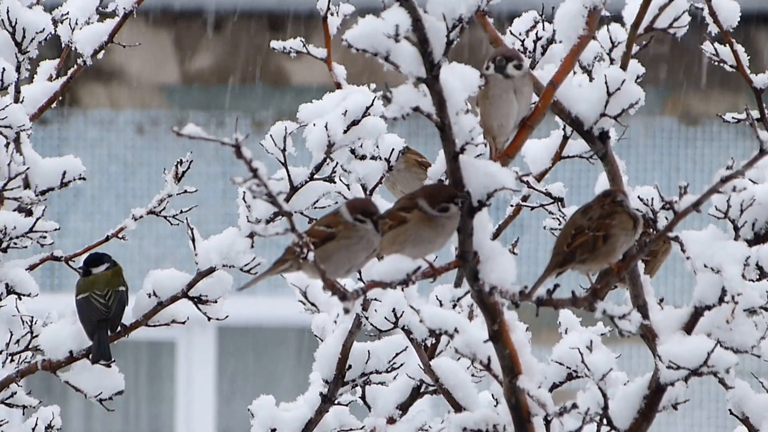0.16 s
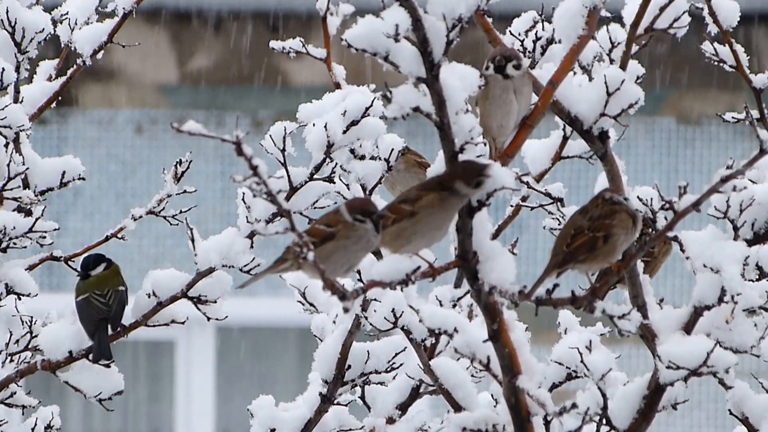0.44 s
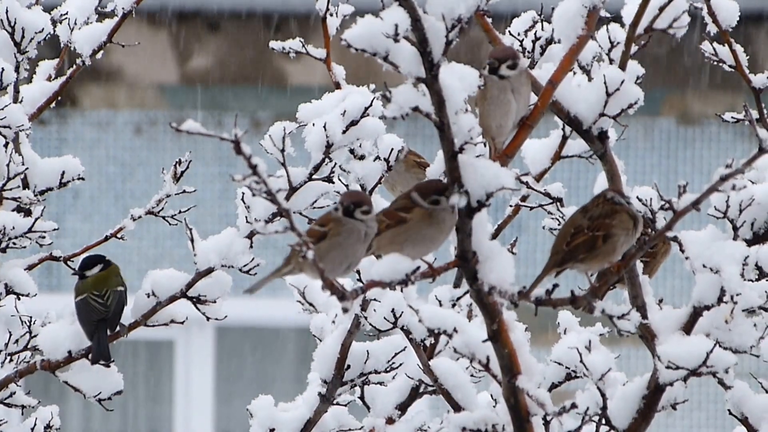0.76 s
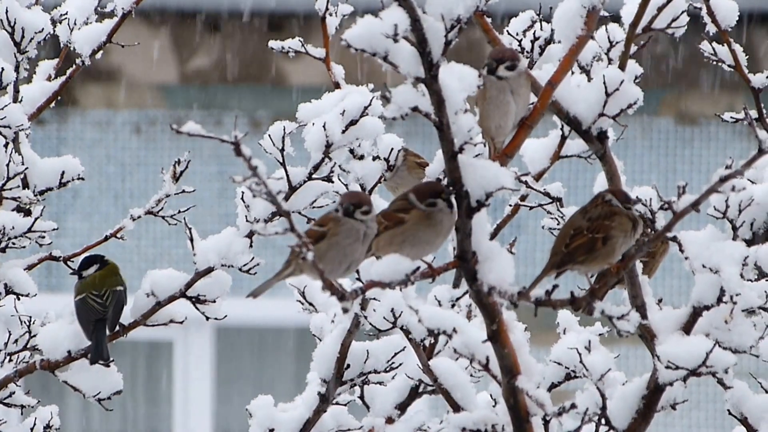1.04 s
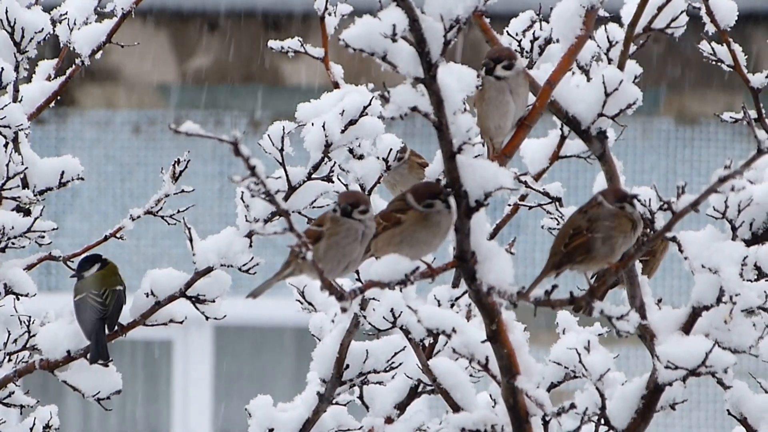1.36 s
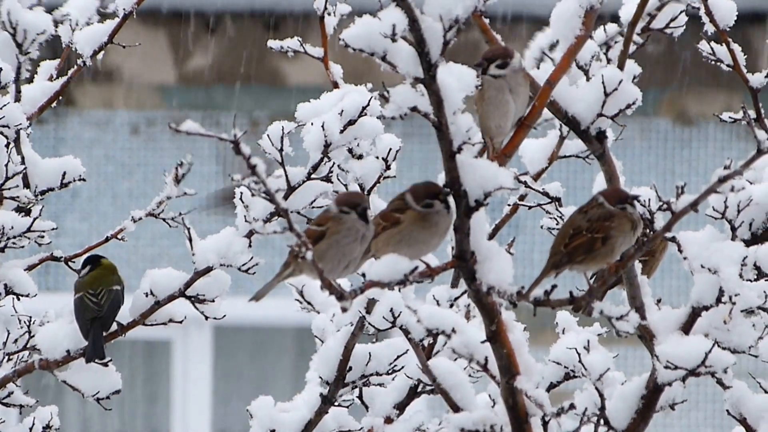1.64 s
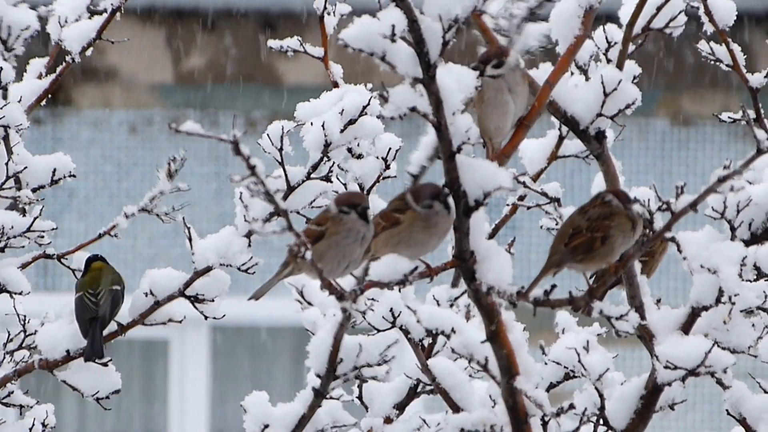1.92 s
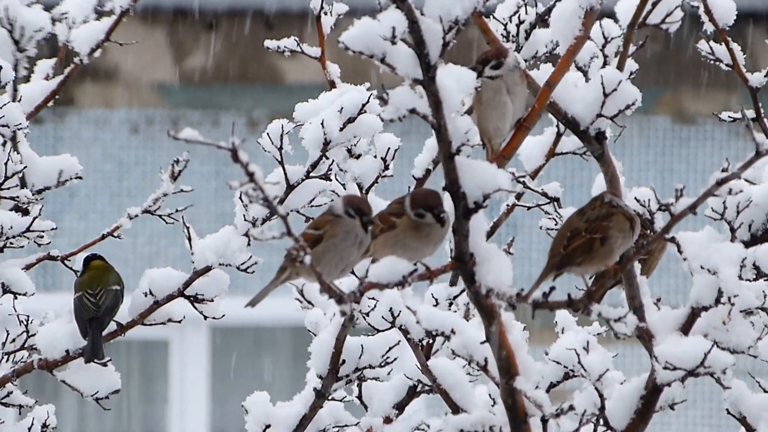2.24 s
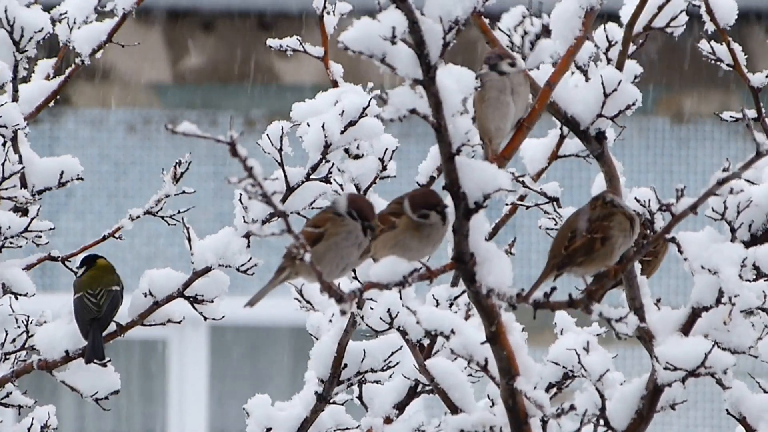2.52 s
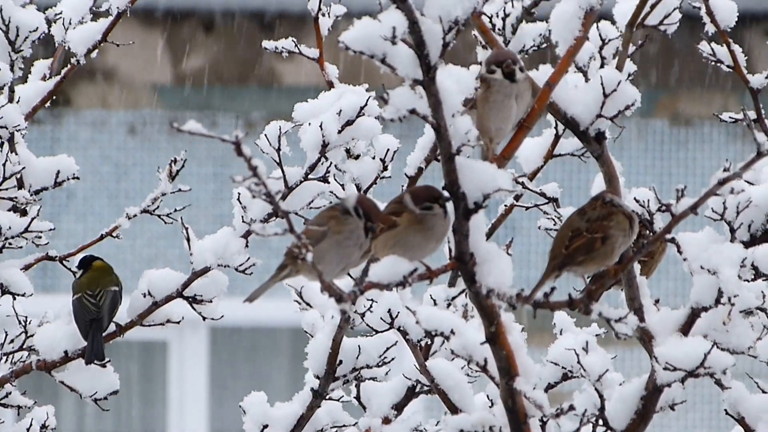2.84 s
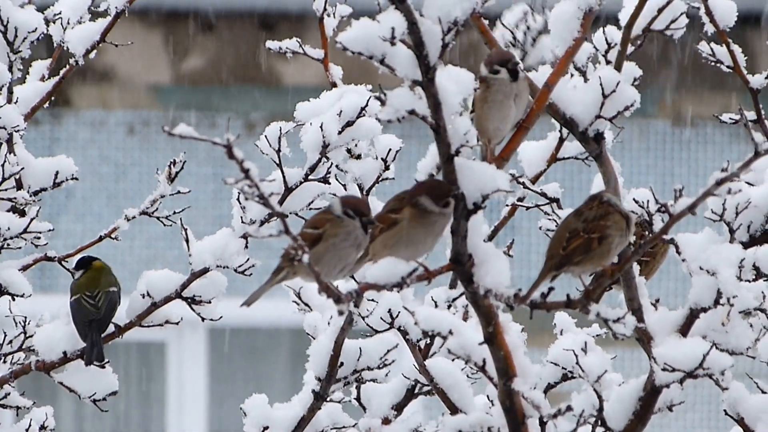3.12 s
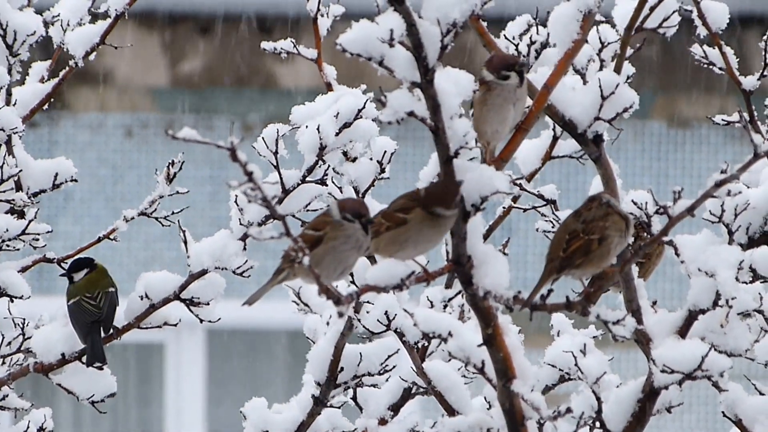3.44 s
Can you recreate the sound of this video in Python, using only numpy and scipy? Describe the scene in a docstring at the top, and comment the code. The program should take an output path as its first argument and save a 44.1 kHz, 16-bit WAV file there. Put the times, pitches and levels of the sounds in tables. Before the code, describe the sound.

Sparrows chirp in a garden, faintly at first, with closer bursts around 0.8 and 1.5 seconds. A distant dog barks three times with an echo between 1.5 and 2.2 seconds. Beaks tick on twigs, sharpest near 2.4 seconds. From 2.9 seconds the chirps come quicker and louder, with a soft wing shuffle around 3.1. A low traffic hum and faint hiss continue throughout.

```python
"""Sparrows chirp in a snowy tree beside a house, some close, some farther off in the garden.
Each note is a gliding whistle that the walls throw back; beaks tick on twigs and one bird
shuffles its wings in soft puffs of air. A dog barks three times far away, its voice echoing
down the street, over the steady low hum of distant traffic and a faint hiss of air."""
import sys
import numpy as np
from scipy import signal
from scipy.fft import rfft, irfft
from scipy.io import wavfile

SR = 44100
rng = np.random.default_rng(int(sys.argv[2]) if len(sys.argv) > 2 else 0)


def store_pcm(level_fs):
    """Save levels as 16-bit WAV."""
    pcm = np.round(np.clip(level_fs, -1, 1) * 32767).astype(np.int16)
    wavfile.write(sys.argv[1], SR, np.atleast_2d(pcm).T)


N = 157878
TIME, FREQS = np.arange(N) / SR, np.fft.rfftfreq(N, 1 / SR)
RASP_HZ = 450   # how fast a rough bird voice flutters


def near_birds():
    """Whistles bend through three pitches, shaped by throat and beak. Gives direct and wall-bound sound."""
    # (start [s], length [s], first pitch [Hz], middle pitch [Hz], last pitch [Hz], level [dB],
    #  roughness [0 = pure], share sent to the walls [dB])
    notes = [ (0.737, 0.027, 4270, 6040, 4500, -52, 0.32, -4),
             (.774, 0.021, 5900, 5580, 5600, -49, 0, -9.5), (.742, 0.055, 3873, 3595, 3600, -60, 1, -3),
             (.787, 0.011, 5900, 5120, 4200, -54, 0.38, -4), (.798, 0.032, 3520, 4200, 4640, -56, .7, -14),
             (.801, 0.027, 5610, 5630, 5600, -54.5, 0.3, -20),
             (1.465, 0.015, 3310, 2640, 2340, -60, 0.34, 3.5),
             (1.478, 0.05, 2345, 4190, 4560, -56, 0.35, -4.5),
             (1.545, .037, 3510, 3080, 2990, -59.5, .3, -18), (1.546, 0.016, 4590, 4700, 4740, -57, 0, -11),
             (1.558, 0.048, 4980, 5900, 6550, -46.5, 0.33, -12.5),
             (1.697, 0.021, 4683, 4850, 4570, -54, 0.35, -8),
             (1.757, 0.037, 4664, 4740, 4760, -57, 0.49, -3),
             (2.387, 0.038, 4750, 4750, 4500, -51, 0.052, -7.5),
             (2.435, .078, 3850, 4900, 5550, -55.5, .16, -7),
             (2.508, 0.055, 5610, 5346, 5310, -59.5, 0.16, -4),
             (2.907, 0.036, 3895, 4390, 4150, -58, 0.45, -3),
             (2.949, 0.077, 4170, 3873, 3750, -56.5, 0.39, -6),
             (3.015, .015, 5620, 4330, 2200, -53, 0.32, -4),
             (3.026, .028, 2480, 2420, 3410, -53, 0.67, -10),
             (3.051, 0.041, 3514, 4453, 3950, -51, 0.36, -4),
             (3.087, .029, 4470, 4910, 5730, -46, 0.18, -13),
             (3.112, 0.044, 5750, 5850, 5650, -44.5, 0.088, -8),
             (3.156, 0.0196, 5700, 5010, 4700, -53, 0.17, -1),
             (3.19, .018, 4420, 5100, 5360, -44.5, 0.17, -5),
             (3.202, .03, 5404, 4964, 4840, -41.5, 0.16, -6.5),
             (3.198, 0.037, 4050, 2480, 3770, -56.5, 0.16, -6),
             (3.23, 0.017, 4500, 3820, 3560, -52, 0.045, -2),
             (3.295, .015, 3890, 4050, 4150, -46, 0.017, -1.5),
             (3.307, 0.03, 4470, 4306, 2950, -39.5, .22, -12),
             (3.328, 0.0195, 3400, 2884, 2580, -51, 0.71, -4),
             (3.378, 0.013, 6960, 4560, 2680, -50, .35, -1),
             (3.388, .014, 3630, 2650, 2460, -50.5, 0.51, -4.5),
             (3.393, .01, 7500, 6330, 4970, -52, 0.17, -7),
             (3.438, 0.034, 4140, 4870, 5250, -49, 0.11, -5.5),
             (3.464, 0.042, 5260, 5350, 5250, -46.5, 0.066, -18), ]
    # how throat and beak boost or weaken each pitch: (frequency [Hz], gain [dB])
    throat = [(2200, -18.5), (3000, -8.5), (4000, -0.5), (6500, 1), (7500, -2), (9200, -19), (11800, -13),
              (13000, -41)]
    fade_s, overtone_step_db = .003, -10
    direct, to_walls = np.zeros((2, N))
    wobble, shake_db = rasp()
    jitter = .85 * drift(RASP_HZ)   # unsteady timing makes the overtones rough
    for start, length, first, middle, last, db, rough, echo_db in notes:
        i, u = span(start, length)
        hz = first * (1 - u) * (1 - 2 * u) + middle * 4 * u * (1 - u) + last * u * (2 * u - 1)
        phase = 2 * np.pi * np.cumsum(hz * (1 + rough * wobble[i])) / SR
        voice = np.zeros(len(i))
        for k in range(1, 4):   # the whistle and two overtones
            gain = from_db(at_hz(throat, k * hz) + overtone_step_db * (k - 1)) * (k * hz < SR / 2)
            voice += gain * np.sin(k * phase + (k - 1) * jitter[i])
        fade = np.clip(np.minimum(u, 1 - u) * length / fade_s, 0, 1)
        swell = 1 + .5 * np.sin(np.pi * u)
        note = from_db(db) * rms_one(fade * swell * from_db(rough * shake_db[i]) * voice)
        direct[i] += note
        to_walls[i] += from_db(echo_db) * note
    return direct, to_walls


def far_birds():
    """Distant calls glide, swell and fade, their overtones lost on the way."""
    # (start [s], length [s], first pitch [Hz], last pitch [Hz], level [dB], roughness [0 = pure])
    calls = [ (0.0, 0.022, 5280, 4840, -65.5, 0.79), (0.176, 0.044, 4560, 4740, -63.5, .12),
             (.245, 0.084, 5130, 4230, -69, 0.96), (.345, .07, 4990, 5250, -67.5, 0.52),
             (.48, 0.071, 3705, 2810, -64, 1.3), (.58, .03, 7880, 8170, -73, .05),
             (.58, .11, 2860, 2843, -72, 0.12), (.635, 0.052, 3756, 3790, -68.5, 0.56),
             (.7, 0.04, 8600, 6640, -69, 0.48), (1.672, 0.056, 5270, 4400, -57, 0.92),
             (1.714, 0.085, 3890, 4010, -60.5, 0.81), (1.965, 0.051, 1644, 2970, -69.5, 0.62),
             (1.99, 0.071, 3920, 3200, -67, 0.94), (2.5, 0.1, 3000, 3100, -67.5, 0.814),
             (2.785, .08, 3986, 3370, -64, 0.64), (2.881, .03, 6200, 7100, -70, 0.21), ]
    out = np.zeros(N)
    wobble, shake_db = rasp()
    for start, length, first, last, db, rough in calls:
        i, u = span(start, length)
        hz = (first + (last - first) * u) * (1 + rough * wobble[i])
        whistle = np.sin(2 * np.pi * np.cumsum(hz) / SR)
        swell = np.sqrt(np.abs(np.sin(np.pi * u)))
        out[i] += from_db(db) * rms_one(swell * from_db(rough * shake_db[i]) * whistle)
    return out


def rasp():
    """A rough bird voice shakes quickly. Gives its pitch wobble (a fraction) and level shake (dB)."""
    warble_hz = 65
    flutter = .045 * drift(RASP_HZ)
    warble = .086 * np.sin(2 * np.pi * warble_hz * TIME + drift(19.8))
    return flutter + warble, 16 * np.tanh(drift(RASP_HZ))


def beak_ticks():
    """Beaks hit twigs with tiny, bright cracks. Gives direct and wall-bound sound."""
    # (time [s], level [dB], share sent to the walls [dB])
    taps = [(1.0152, -44, -3), (1.3275, -48, -2), (1.594, -51, -8), (2.3565, -35, 6), (2.371, -44, 2),
            (2.944, -50, -10)]
    # the tone of a crack: (frequency [Hz], relative level [dB])
    crack_spectrum = [(600, -32), (1300, -2), (2500, -6), (4100, 10.5), (6000, 9.5), (7700, 12.5),
                      (10500, -6), (15000, -24)]
    rise_s = .00074
    white = rfft(rng.standard_normal(N))
    crack = rms_one(irfft(white * from_db(at_hz(crack_spectrum, FREQS)), N))
    direct, to_walls = np.zeros((2, N))
    for start, db, echo_db in taps:
        i, _ = span(start, length=.02)
        age = (i - i[0]) / SR / rise_s
        tick = from_db(db) * age * np.exp(1 - age) * crack[i]
        direct[i] += tick
        to_walls[i] += from_db(echo_db) * tick
    return direct, to_walls


def wings():
    """A short shuffle of feathers pushes out soft puffs of air."""
    # (start [s], length [s], centre frequency [Hz], level [dB])
    strokes = [(0.138, 0.07, 8800, -64), (3.092, 0.031, 1190, -57.5), (3.104, 0.073, 530, -57)]
    out = np.zeros(N)
    for start, length, hz, db in strokes:
        i, u = span(start, length)
        band = signal.butter(2, [hz / 1.36, hz * 1.26], "band", fs=SR, output="sos")
        puff = rms_one(signal.sosfilt(band, rng.standard_normal(N)))
        out[i] += from_db(db) * np.sin(np.pi * u) * puff[i]
    return out


def dog():
    """Each bark rises and falls in pitch, is shaped by the muzzle and echoes down the street."""
    # (start [s], length [s], top pitch [Hz], level [dB], share sent to the street's ring [dB])
    barks = [(1.456, 0.087, 508.8, -47.5, -7), (1.743, 0.096, 508.4, -48, 12.5),
             (2.144, 0.079, 492.6, -50.5, 8.5)]
    # how the muzzle boosts or weakens each pitch: (frequency [Hz], gain [dB])
    muzzle = [(380, 0), (500, 5.5), (620, 5), (790, 14.5), (900, -4.5), (1020, 6.5), (1200, -6),
              (1550, -19), (2200, -33)]
    # sound bouncing off houses: (delay [s], level [dB])
    house_echoes = [(.055, -10.5)]
    pitch_drop, roughness = .2524, .022   # fractions of the pitch
    right_delay_s = .00014   # the dog is off to the left
    direct, to_ring = np.zeros((2, N))
    shake = drift(250)
    for start, length, top_hz, db, ring_db in barks:
        i, u = span(start, length)
        arch = np.abs(np.sin(np.pi * u ** 1.312))
        hz = top_hz * (1 - pitch_drop * (1 - arch)) * (1 + roughness * shake[i])
        phase = 2 * np.pi * np.cumsum(hz) / SR
        voice = sum(from_db(at_hz(muzzle, k * hz)) * np.sin(k * phase) for k in range(1, 5))
        bark = from_db(db) * rms_one(voice * arch ** .5)
        direct[i] += bark
        to_ring[i] += from_db(ring_db) * bark
    ring = signal.lfilter(*signal.iirpeak(771, Q=38, fs=SR), to_ring)   # the street rings at 771 Hz
    street = reflections(direct + ring, decay_s=.9, likeness=.28, tail_db=-1.5, echoes=house_echoes)
    left, right = direct + street
    return np.array([left, np.interp(TIME - right_delay_s, TIME, right)])


def garden_walls(chirps, ticks):
    """Nearby walls throw the chirps and ticks back."""
    # distinct bounces of the chirps: (delay [s], level [dB])
    wall_echoes = [(.007, -5.5), (0.014, -9)]
    chirp_echo = reflections(chirps, decay_s=.32, likeness=.72, tail_db=4.5, echoes=wall_echoes)
    return chirp_echo + reflections(ticks, decay_s=.29, likeness=.72, tail_db=-2.5)


def reflections(x, decay_s, likeness, tail_db, echoes=()):
    """Sound bounces back as distinct echoes and a scattered tail that falls 60 dB in decay_s."""
    t = TIME[:SR]
    envelope = from_db(-60 * t / decay_s) * np.minimum(t / .0027, 1)
    tail = two_ears(rng.standard_normal((2, SR)) * envelope, likeness)
    response = from_db(tail_db) * rms_one(tail) / np.sqrt(SR)
    for delay, db in echoes:
        response[:, int(delay * SR)] += from_db(db)
    return signal.fftconvolve(x[None], response, axes=1)[:, :N]


def traffic():
    """Distant traffic blends into a steady low hum."""
    # (frequency [Hz], relative level [dB])
    hum_spectrum = [(25, -32), (60, -43), (95, -26), (120, -3.5), (155, -5), (186, 4), (208, -10), (235, 3),
                    (290, -8.5), (335, -7), (400, -3.5), (440, -7), (490, 1.5), (530, -4), (580, 1.5),
                    (680, -5), (1000, -6.5), (1400, -12), (2200, -18), (5000, -19.5), (15000, -48)]
    return far_noise(hum_spectrum, db=-56.5)


def air():
    """The open air hisses faintly."""
    # (frequency [Hz], relative level [dB])
    hiss_spectrum = [(500, 4), (2000, -8.5), (3300, -7), (5000, -1.5), (7000, -1), (10000, -6.5),
                     (13000, -12.5), (15500, -21)]
    return far_noise(hiss_spectrum, db=-64)


def far_noise(spectrum, db):
    """Steady noise from far away reaches the two ears with different level and timing."""
    # how alike the two ears' sound is: (frequency [Hz], likeness [0 to 1])
    likeness = [(60, 0.65), (190, 0.93), (300, 0.52), (580, 0.69), (1400, 0.16), (3100, 0.36), (7000, 0.63),
                (15000, 0.19)]
    # which side is louder: (frequency [Hz], left minus right [dB])
    lean = [(75, -11), (140, -1.5), (220, -9), (310, 0), (500, -4), (800, -0.5)]
    # how far the wave at the left ear is ahead: (frequency [Hz], phase [radians])
    lead = [(150, -0.03), (235, 1.2), (310, 2), (520, 1.58), (1000, 2.5), (3300, 0.5)]
    half_each = np.array([[.5], [-.5]])
    noise = two_ears(rfft(rng.standard_normal((2, N))), at_hz(likeness, FREQS))
    gain = from_db(at_hz(spectrum, FREQS) + half_each * at_hz(lean, FREQS))
    phase_shift = np.exp(1j * half_each * at_hz(lead, FREQS))
    return from_db(db) * rms_one(irfft(noise * gain * phase_shift, N))


def two_ears(noises, likeness):
    """Mix two noises into left and right: likeness 0 is unrelated, 1 is identical."""
    mid, side = noises
    return np.sqrt(1 + likeness) * mid + np.sqrt(1 - likeness) * side * [[1], [-1]]


def from_db(db):
    """Turn decibels into a multiplier."""
    return 10 ** (np.asarray(db) / 20)


def rms_one(x):
    """Scale a sound to an average power of 1."""
    return x / np.sqrt(np.mean(x ** 2) + 1e-20)


def at_hz(points, hz):
    """Read between the rows of a frequency table, with octaves evenly spaced."""
    f, value = np.transpose(points)
    return np.interp(np.log(np.maximum(hz, 1)), np.log(f), value)


def drift(rate_hz):
    """A smooth random wander, typically about 1 in size."""
    return rms_one(irfft(rfft(rng.standard_normal(N)) / (1 + (FREQS / rate_hz) ** 2), N))


def span(start, length):
    """The sample positions i of an event and its progress u from 0 to 1."""
    i = np.arange(max(int(start * SR), 0), min(int((start + length) * SR), N))
    return i, np.clip((i / SR - start) / length, 0, 1)


def scene():
    """Birds in the garden, with the dog and the traffic beyond it."""
    song, song_to_walls = near_birds()
    chatter = far_birds()
    ticks, ticks_to_walls = beak_ticks()
    echoes = garden_walls(song_to_walls + from_db(-1) * chatter, ticks_to_walls)
    garden = (song + chatter + ticks + wings() + echoes) * from_db([[-.25], [.25]])   # a touch right
    return garden + dog() + traffic() + air()


def record(dry):
    """Cut the highest treble steeply and shift the wave by a small, silent offset."""
    cutoff_hz, offset = 15650, -.003
    treble_cut = signal.ellip(12, .1, 80, cutoff_hz, fs=SR, output="sos")
    return signal.sosfilt(treble_cut, dry) + offset


dry = scene()
out = record(dry)
store_pcm(out)
```